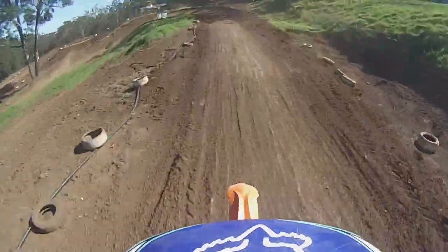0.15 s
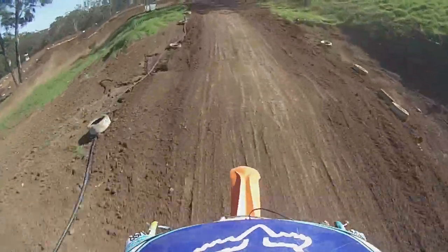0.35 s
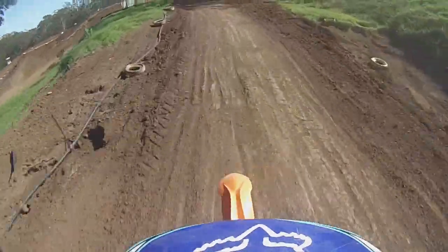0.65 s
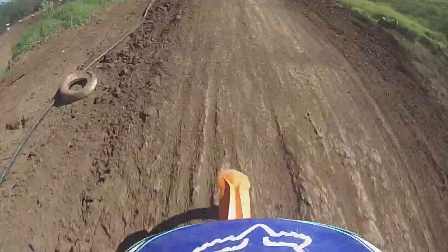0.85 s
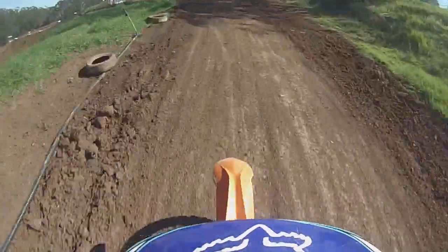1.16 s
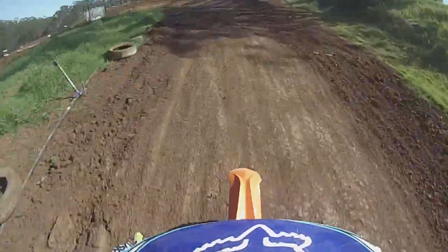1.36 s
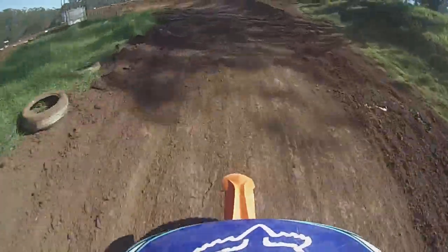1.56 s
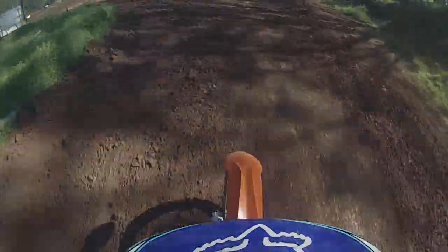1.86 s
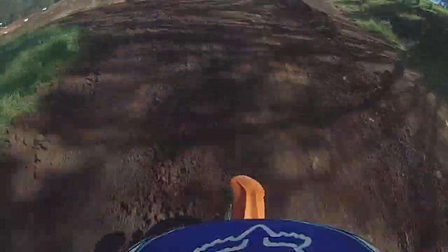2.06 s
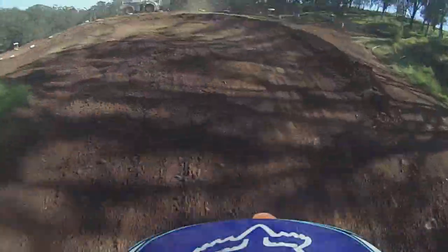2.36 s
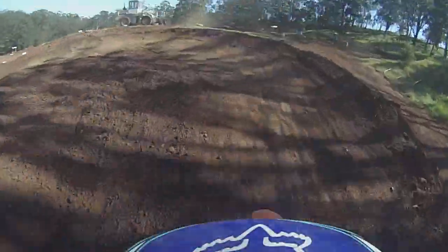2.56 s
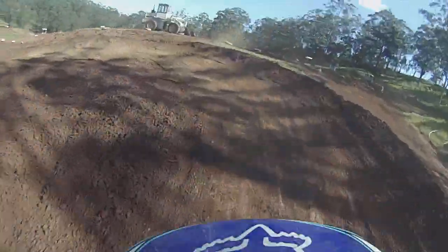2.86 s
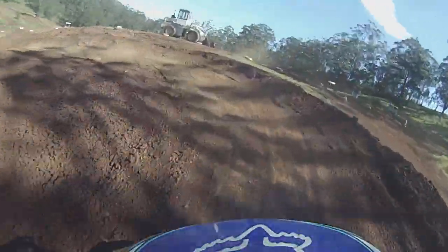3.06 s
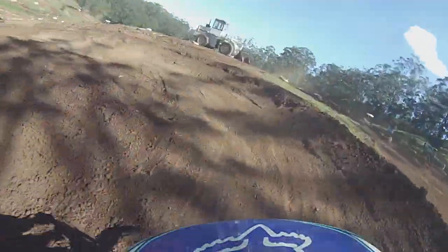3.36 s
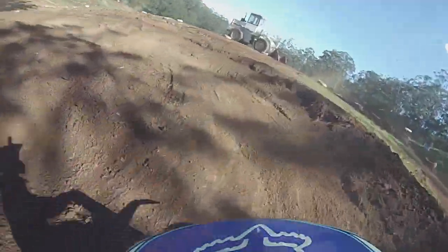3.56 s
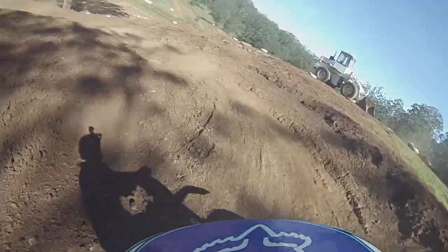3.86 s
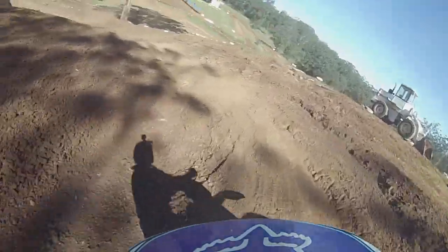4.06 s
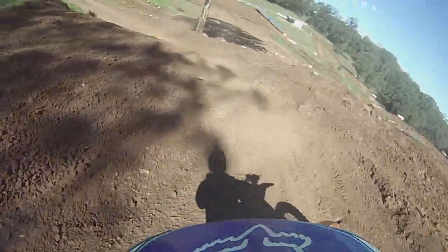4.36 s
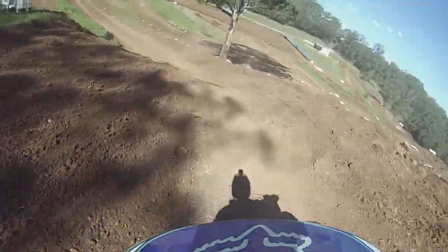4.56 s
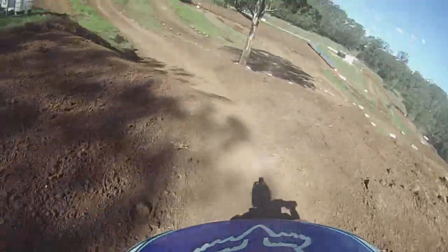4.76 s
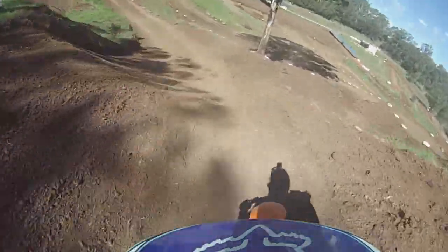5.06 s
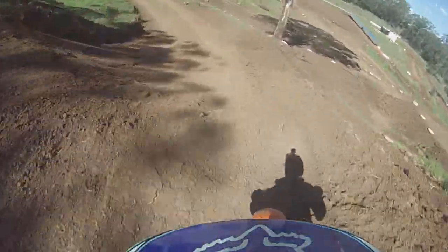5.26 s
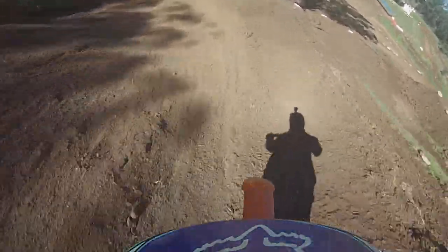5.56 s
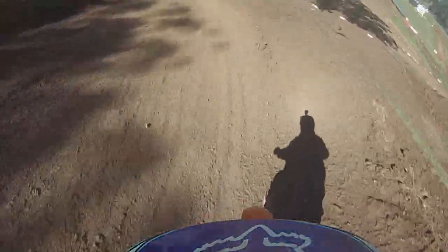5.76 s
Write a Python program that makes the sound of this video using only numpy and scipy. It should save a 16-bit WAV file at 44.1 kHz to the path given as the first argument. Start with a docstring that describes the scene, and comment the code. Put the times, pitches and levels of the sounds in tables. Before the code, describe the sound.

From a rider's helmet, loud irregular exhaust pops and heavy bumps fade to soft engine rustle and wind, then a short buzzing pull and shutoff.

```python
"""A small four-stroke dirt bike engine, heard from a sealed camera housing on the rider's helmet. Coasting, it
fires unevenly: clicks ring the housing as exhaust pops over noise that pulses each turn. Pulling out of the
bend, it drones on a few firing orders, with pulses and gas noise rasping in the pipe. Bumps swing the mount
(decaying sines), the mount knocks, grit ticks, wind buffets (low noise). The recorder's gain control ducks late
after heavy low-frequency overload."""
import sys
import numpy as np
from scipy import signal
from scipy.io import wavfile
from scipy.ndimage import minimum_filter1d

SR = 44100
rng = np.random.default_rng(int(sys.argv[2]) if len(sys.argv) > 2 else 0)


def store_wav(level_fs):
    """Save 16-bit WAV to argv[1]."""
    pcm = np.round(np.clip(np.atleast_2d(level_fs), -1, 1) * 32767)
    wavfile.write(sys.argv[1], SR, pcm.T.astype(np.int16))


N = 260631
TIME_S = np.arange(N) / SR

# engine through the ride: t/s, crank rate/(turns/s), noise level/dB, mount shake level/dB; all waver
ENGINE = [(0.0, 93, -37, -12), (0.13, 79.6, -33.5, -23.5), (0.448, 85, -31, -34.5),
          (0.65, 96.6, -32, -21.5), (0.801, 93, -30, -22), (0.92, 83, -35.5, -22.5), (1.2, 81.5, -33, -25),
          (1.32, 79.6, -34, -22.5), (1.54, 76.4, -36, -20), (1.62, 76, -35, -31.5), (1.841, 76.5, -42, -28),
          (2.3, 72, -44, -37), (3.2, 72, -47, -40), (3.5, 72, -44.5, -45), (4.0, 66, -46.5, -37.5),
          (4.45, 69, -44, -36), (5.43, 79, -37.5, -35), (5.65, 79.4, -40, -26.5), (5.91, 80, -36, -31.5)]
# firing under load: t/s, mean rate/(firings/s)
FIRING = [(4.25, 49), (4.324, 44.2), (4.446, 47.3), (4.526, 48.4), (4.664, 46.1), (5.34, 50.1), (5.43, 48)]
# load, as mean rasp level: t/s, level/dB
LOAD = [(4.22, -41.5), (4.5, -43), (4.72, -44), (5.04, -41), (5.13, -37.5), (5.3, -41.5), (5.4, -34.5),
        (5.455, -36)]
# firing orders clear in the drone: multiple of firing rate, relative level/dB
DRONE_ORDERS = [(4, -6), (5, 0), (6, -.5), (7, -3)]
# pipe favours orders near its lowest resonance: f/Hz, offset/Hz at which an order loses 6 dB (loss grows with
# the square)
DRONE_PEAK = (253.5, 51)
# loud exhaust pops: t/s, nominal level/dB, upper ring relative level/dB
LOUD_POPS = [(0.0148, -7, -28), (0.1298, -3.5, -6.5), (0.2018, -6, -3.5), (0.4965, -19, -3),
             (0.518, -2, -5), (0.5729, -7.5, -15), (0.6249, -3.5, -5.5), (0.6465, -4, -8.5),
             (0.6979, -5, -7.5), (0.7184, -6.5, -3.5), (0.7395, -1.5, -11), (0.7608, -7.5, -4.5),
             (0.7917, -8, -19), (0.813, -5.5, -19), (0.836, -5, -8.5), (0.8571, -13.5, -17),
             (0.9052, -14, -26), (0.9297, -7, -35), (0.986, -7, -21), (1.0469, -6.5, -21),
             (1.0723, -2.5, -17), (1.098, -10.5, -22), (1.1229, -9.5, -32), (1.2073, -6.5, -19),
             (1.268, -11.5, -14), (1.293, -7, -23), (1.3198, -5, -9.5), (1.3971, -3.5, -9),
             (1.4221, -6.5, -15), (1.4489, -7, -17), (1.474, -8, -28), (1.5021, -8, -22),
             (1.5284, -14, -16), (1.5562, -8.5, -16), (1.5833, -20, -7), (1.6358, -14, -11),
             (1.724, -20, -5), (1.7795, -34, -17.5), (3.6393, -22, -11), (5.557, -22, -14),
             (5.675, -21, -10), (5.7338, -26, -2), (5.8178, -18.5, -10), (5.877, -18, -8)]
# tyre scrub swell while braking into the bend: middle t/s, time to 1/e of the dB swell/s, swell/dB
BRAKING = (2.6, .14, 6)

# Mode tables: f/Hz, nominal width/Hz (body() widens it), relative level/dB
# housing resonances, on engine noise, pop spit and jolt rattle
HOUSING_MODES = [(800, 420, -19), (1303, 220, -6.5), (1572, 224, -6), (2186, 526, -7), (2690, 905, -16.5),
                 (3530, 2340, -24.5)]
# treble of the engine noise
TREBLE_MODES = [(5950, 2900, 9.5), (7180, 1900, -1), (9100, 1200, -32), (12100, 11500, -5.5),
                (14800, 1700, -21)]
# sizzle near 5 kHz
SIZZLE_MODES = [(3700, 670, -4.5), (4867, 490, -1.5), (5250, 900, -10)]
# exhaust pipe resonances
PIPE_MODES = [(497, 69, 1.5), (599.5, 47, 1), (673, 52, 2.5), (788, 71, -8.5)]
# low engine growl
GROWL_MODES = [(111.7, 45.4, 5.5), (268, 94, 3), (457, 178, -11.5), (635, 220, -13.5)]

# jolts of the mount: t/s, nominal level/dB, settled ring f/Hz, t60/s
JOLTS = [(0.845, 6, 42.5, 0.11), (3.635, 4.5, 76.8, 0.21), (3.175, -13.5, 44.7, 0.22),
         (3.545, -19, 49.7, 0.082), (4.23, -10, 43.7, 0.15), (4.611, -15, 38.7, 0.094),
         (4.845, -8, 50, 0.13)]
# mount knocking in its clip: t/s, level of the 660 Hz ring/dB
KNOCKS = [(2.163, -44), (2.601, -46), (2.937, -47), (3.188, -42), (3.448, -39.5), (3.545, -46),
          (3.637, -41), (3.862, -34), (3.994, -36), (4.233, -39)]
# grit ticking on the housing: t/s, nominal level/dB
GRIT = [(5.476, -39), (5.541, -38), (5.898, -40)]
# wind on the housing: t/s, mean level/dB
WIND = [(0.0, -24), (0.62, -29), (0.85, -19), (1.12, -21), (1.5, -27), (1.63, -17.5), (1.79, -19.5),
        (2.15, -32.5), (2.5, -26.5), (3.0, -27), (3.15, -22), (3.45, -19), (3.75, -22.5), (4.45, -26.5),
        (4.72, -26), (4.9, -23.5), (5.46, -28), (5.72, -18.5), (5.91, -24.5)]

# laws of layers that follow a driving level: (dB when it is at FULL_DB, dB lost per dB it falls)
FULL_DB = -32
SCRUB_LAW, SIZZLE_LAW, TREBLE_LAW, GROWL_LAW = (-35, 1.258), (-45.5, 1.55), (-63.5, 0.37), (-30, 1.245)
DRONE_LAW, SURGE_SPREAD_DB = (-26.5, 0.57), 1.5
OPEN_S, SHUT_S, EDGE_S = 4.215, 5.455, 0.037   # throttle
# weak pops: mean level over engine noise, spread of both levels, mean upper ring; longest gap filled
WEAK_OVER_NOISE_DB, WEAK_SPREAD_DB, WEAK_UPPER_DB, LONGEST_GAP_S = 11.5, 4, -9, 0.2
DUCK_FROM_DB, DUCK_DEPTH_DB, DUCK_LATE_S, DUCK_HOLD_S, DUCK_RECOVERY_DB_PER_S = -8, 13, 0.005, 0.035, 65
CUTOFF_HZ = 15900


def engine(crank_hz, noise_db, shake_db):
    """Crank shake as a wavering tone with pipe puffs; noise pulsing every turn, through resonances."""
    middle_s, width_s, swell_db = BRAKING
    braking_db = swell_db * np.exp(-((TIME_S - middle_s) / width_s) ** 2)
    scrub_db = follows(SCRUB_LAW, noise_db) + braking_db
    sizzle_db, treble_db, growl_db = [follows(law, noise_db) for law in (SIZZLE_LAW, TREBLE_LAW, GROWL_LAW)]

    turns = np.cumsum(crank_hz * (1 + 0.03 * drift(23.95))) / SR
    beat = amp(1.0 * np.cos(2 * np.pi * turns) + 0.88 * drift(33))
    white = beat * rng.standard_normal((2, N))
    rush = amp(noise_db) * rms_one(body(white[0], HOUSING_MODES[:3]))
    scrub = amp(scrub_db) * rms_one(body(white[1] * amp(0.8 * drift(8)), HOUSING_MODES[3:]))
    sizzle = amp(sizzle_db + drift(8)) * rms_one(body(white[0], SIZZLE_MODES))
    treble = amp(treble_db + drift(8)) * rms_one(body(white[1], TREBLE_MODES))
    growl_noise = amp(0.5 * drift(35)) * rng.standard_normal(N)
    growl = amp(growl_db) * rms_one(body(growl_noise, GROWL_MODES))

    puffs = np.diff(np.floor(turns), prepend=0)   # one per turn
    strokes = amp(-16.5) * rms_one(body(puffs, GROWL_MODES[1:2]))
    strokes += amp(-25.5) * rms_one(body(puffs, PIPE_MODES))
    shake = amp(shake_db + 2 * drift(12)) * (np.sin(2 * np.pi * turns) + strokes)
    return shake + rush + scrub + sizzle + treble + growl


def pull():
    """Steady firing: a few clean low orders; pulses and turbulent gas rasp in the pipe modes."""
    throttle = np.clip(np.minimum(TIME_S - OPEN_S, SHUT_S - TIME_S) / EDGE_S, 0, 1)
    firing_hz, load_db = in_time(FIRING)[0], in_time(LOAD)[0]
    phase = np.cumsum(firing_hz * (1 + 0.006 * drift(15))) / SR   # in firings
    pulses = np.diff(np.floor(phase), prepend=0)
    gas = rng.standard_normal(N) * np.exp(-1.3 * (phase % 1))

    peak_hz, off_hz = DRONE_PEAK
    drone = np.zeros(N)
    for order, order_db in DRONE_ORDERS:
        off_peak_db = -6 * ((order * firing_hz - peak_hz) / off_hz) ** 2
        level_db = order_db + off_peak_db + 2.0 * drift(13)
        drone += amp(level_db) * np.sin(2 * np.pi * order * phase)
    rasp = 0.75 * rms_one(body(pulses, PIPE_MODES)) + 0.6 * rms_one(body(gas, PIPE_MODES))

    drone_db = follows(DRONE_LAW, load_db) + SURGE_SPREAD_DB * drift(5)
    rasp_db = load_db + SURGE_SPREAD_DB * drift(11.2)
    return throttle * (amp(drone_db) * drone + amp(rasp_db) * rasp)


def pops():
    """Each pop rings the housing, with a bright crack and gas spit, and returns once from the ground."""
    s, level_db, upper_db = all_pops()
    # chance per pop: main ring leans flat or sharp, crack dull or bright
    lean, bright = rng.uniform(-1, 1, (len(s), 2)).T
    ring = peak_one(1388, 433, clicks(s, level_db - 0.5 - 1.0 * lean))
    ring += peak_one(1620, 270, clicks(s + 0.00035, level_db - 24 + 1.0 * lean))
    ring += peak_one(2255, 570, clicks(s + 0.001075, level_db + upper_db))
    ring += peak_one(885, 210, clicks(s, level_db - 24 - 3 * bright))
    ring += peak_one(2860, 370, clicks(s + 0.00122, level_db + upper_db - 14.5))

    puff = signal.windows.hann(int(0.0073 * SR))
    burst = np.convolve(clicks(s, level_db - 33 + 4 * bright), puff)[40:N + 40]
    crack_modes = SIZZLE_MODES + [(7200, 3000, -18), (11100, 3100, -31)]
    crack = burst * rms_one(body(rng.standard_normal(N), crack_modes))
    spit = amp(15) * burst * rms_one(body(rng.standard_normal(N), HOUSING_MODES[1:]))

    direct, lag = ring + crack + spit, int(0.004 * SR)
    return direct + amp(-14.5) * np.concatenate([np.zeros(lag), direct[:-lag]])


def all_pops():
    """Loud pops, plus weak firing about every second turn, dividing the short gaps evenly."""
    at_s, crank_hz, noise_db, _ = np.transpose(ENGINE)
    loud = np.array(LOUD_POPS)
    chance = rng.standard_normal((len(loud), 8, 2))
    weak = []
    for k, (first_s, gap_s) in enumerate(zip(loud[:, 0], np.diff(loud[:, 0]))):
        cycles = 1
        if gap_s < LONGEST_GAP_S:
            cycles = int(round(gap_s * np.interp(first_s, at_s, crank_hz) / 2))
        for n in range(1, min(cycles, 9)):
            s = first_s + gap_s * n / cycles
            strength_db, colour_db = WEAK_SPREAD_DB * chance[k, n - 1]
            level_db = np.interp(s, at_s, noise_db) + WEAK_OVER_NOISE_DB + strength_db
            weak.append((s, level_db, WEAK_UPPER_DB + colour_db))
    return np.vstack([loud, weak]).T


def jolts():
    """A bump swings the mount, pitch sagging as it settles, with a short noise rattle on top."""
    out = np.zeros(N)
    rattle_modes = HOUSING_MODES + [(185, 76, 13.0), (513, 220, -13), (5000, 3000, -23)]
    rattle = rms_one(body(rng.standard_normal(N), rattle_modes))
    for s, level_db, hz, t60_s in JOLTS:
        t = np.maximum(TIME_S - s, 0)
        cycles = hz * (t + 0.007 * (1 - np.exp(-t / 0.01)))
        attack = 1 - np.exp(-(t / 0.01) ** 2)
        out += amp(level_db - 60 * t / t60_s) * attack * np.sin(2 * np.pi * cycles)
        rattle_burst = np.exp(-((t - 0.007) / 0.0086) ** 2) * (t > 0)
        out += amp(level_db - 30.5) * rattle_burst * rattle
    return out


def knocks():
    """Dull plastic taps: clicks through three resonances."""
    s, level_db = np.transpose(KNOCKS)
    taps = peak_one(660, 220, clicks(s, level_db))
    taps += peak_one(1303, 250, clicks(s, level_db + 5))
    return taps + peak_one(186, 94, clicks(s, level_db - 4.0))


def grit():
    """Tiny bright ticks: high resonant noise in 2.5 ms decays."""
    s, level_db = np.transpose(GRIT)
    burst = signal.lfilter([1], [1, -np.exp(-1 / (0.0025 * SR))], clicks(s, level_db - 4.5))
    return burst * rms_one(body(rng.standard_normal(N), [(6940, 1300, 5), (10650, 2600, -6)]))


def wind():
    """Buffeting: lumpy noise, strongest below 40 Hz, that also rocks the mount."""
    white = rng.standard_normal((2, N))
    low = signal.sosfilt(signal.butter(2, [7, 36], "band", fs=SR, output="sos"), white[0])
    rock = amp(-12.5) * rms_one(body(white[1], [(66.7, 34, 0.5), (106.5, 33, -8)]))
    lumpy = (rms_one(low) + rock) * amp(2.0 * drift(7))
    return amp(in_time(WIND)[0]) * rms_one(lumpy)


def amp(db):
    """dB to amplitude."""
    return 10 ** (np.asarray(db) / 20)


def rms_one(x):
    """Scale to RMS 1."""
    return x / np.sqrt(np.mean(x ** 2) + 1e-20)


def in_time(rows):
    """Columns of a curve table, one value per sample."""
    s, *columns = np.transpose(rows)
    return [np.interp(TIME_S, s, column) for column in columns]


def follows(law, driver_db):
    """Level of a layer tied linearly, in dB, to a driving level."""
    return law[0] + law[1] * (driver_db - FULL_DB)


def drift(corner_hz):
    """Slow chance of spread 1: noise through a double one-pole low-pass."""
    r = np.exp(-2 * np.pi * corner_hz / SR)
    return rms_one(signal.lfilter([1], [1, -2 * r, r * r], rng.standard_normal(N + SR))[SR:])


def resonate(x, hz, width_hz):
    """Two resonators in a row: gain 1 on top, steep flanks, a swelling attack."""
    r = np.exp(-np.pi * width_hz / SR)
    b = (1 - r * r) / 2 * np.array([1, 0, -1])
    a = [1, -2 * r * np.cos(2 * np.pi * hz / SR), r * r]
    return signal.lfilter(b, a, signal.lfilter(b, a, x + 1e-18))


def body(x, modes):
    """Parallel resonances with alternating signs; each resonator 1.2 times its nominal width."""
    return sum((-1) ** k * amp(db) * resonate(x, hz, 1.2 * width_hz)
               for k, (hz, width_hz, db) in enumerate(modes))


def clicks(times_s, db):
    """A click train with one strength per event."""
    out = np.zeros(N)
    out[np.minimum((np.array(times_s) * SR).astype(int), N - 1)] = amp(db)
    return out


def peak_one(hz, width_hz, x):
    """A steep resonance that swells and dies evenly; a unit click peaks at 1."""
    click = resonate(resonate(np.eye(1, 2000)[0], hz, width_hz), hz, width_hz)
    return resonate(resonate(x, hz, width_hz), hz, width_hz) / np.max(np.abs(click))


def scene():
    """All sources at the one microphone."""
    motor = engine(*in_time(ENGINE)) + pull() + pops()
    return (wind() + motor + jolts() + knocks() + grit())[None]


def record(dry):
    """Gain control ducks late on heavy overload, holds, recovers; peaks are rounded, the top is cut."""
    heavy = signal.sosfilt(signal.butter(1, [25, 80], "band", fs=SR, output="sos"), dry[0])
    over_db = np.maximum(20 * np.log10(np.abs(heavy) + 1e-9) - DUCK_FROM_DB, 0)
    wanted_db = np.minimum(10 * over_db, DUCK_DEPTH_DB)
    hold, late = int(DUCK_HOLD_S * SR), int(DUCK_LATE_S * SR)
    held_db = -minimum_filter1d(-wanted_db, size=hold, origin=(hold - 1) // 2)   # running maximum
    ramp_db = DUCK_RECOVERY_DB_PER_S * TIME_S
    duck_db = np.maximum.accumulate(held_db + ramp_db) - ramp_db
    r = np.exp(-1 / (0.0016 * SR))
    duck_db = signal.lfilter([1 - r], [1, -r], np.concatenate([np.zeros(late), duck_db[:-late]]))

    bass = signal.sosfilt(signal.butter(2, 110, fs=SR, output="sos"), dry)
    ducked = bass * amp(-0.35 * duck_db) + (dry - bass) * amp(-duck_db)   # bass is ducked less
    limited = 1.2 * np.tanh(ducked / 1.2)
    return signal.sosfilt(signal.cheby2(14, 60, CUTOFF_HZ, fs=SR, output="sos"), limited)


dry = scene()
out = record(dry)
store_wav(out)
```